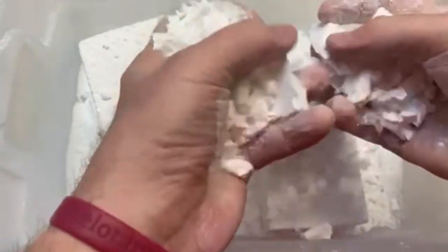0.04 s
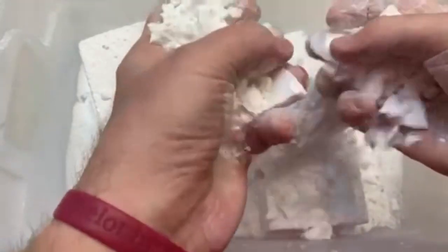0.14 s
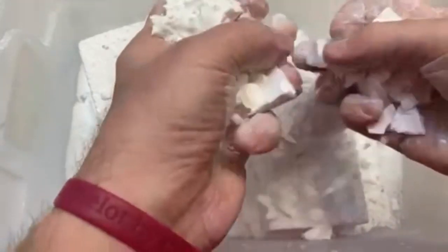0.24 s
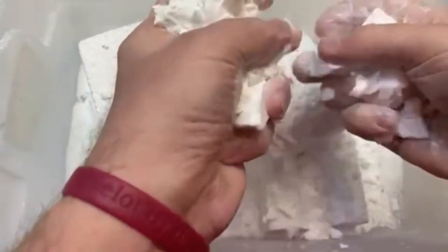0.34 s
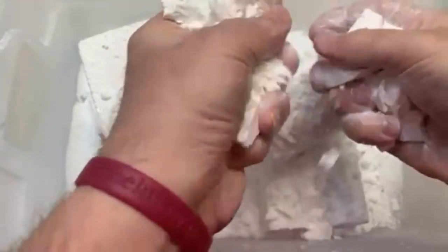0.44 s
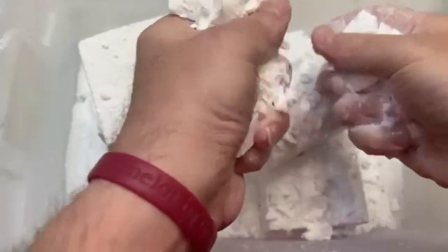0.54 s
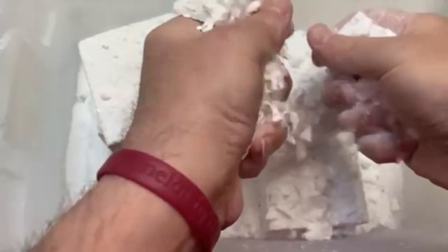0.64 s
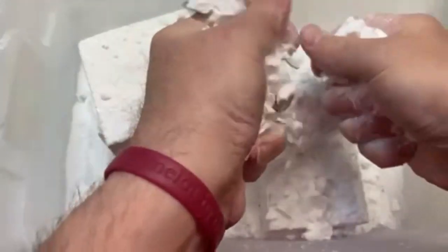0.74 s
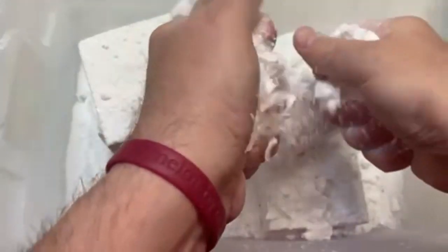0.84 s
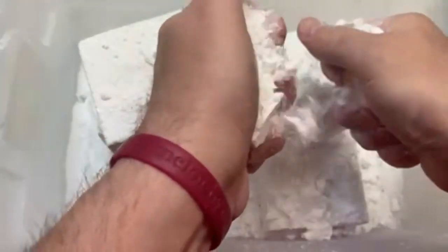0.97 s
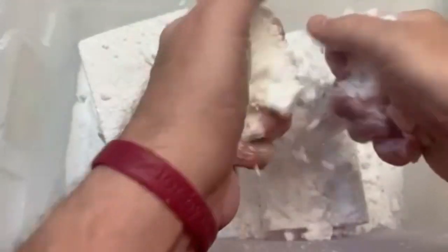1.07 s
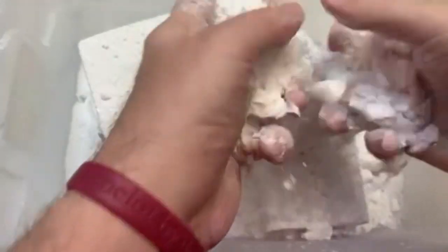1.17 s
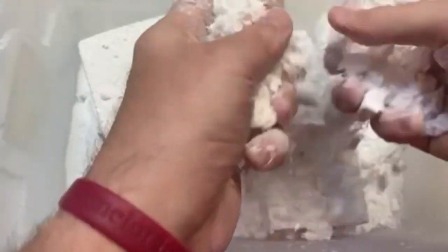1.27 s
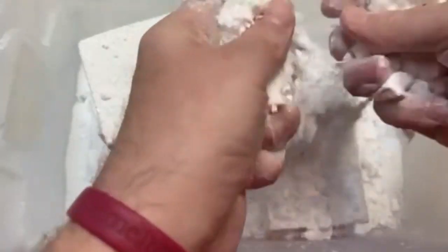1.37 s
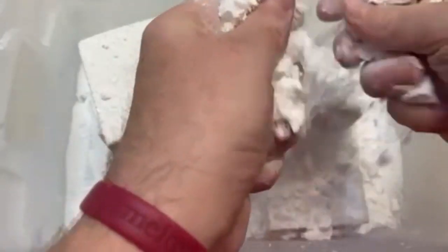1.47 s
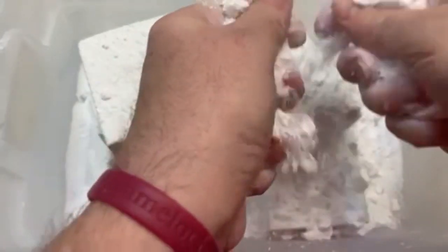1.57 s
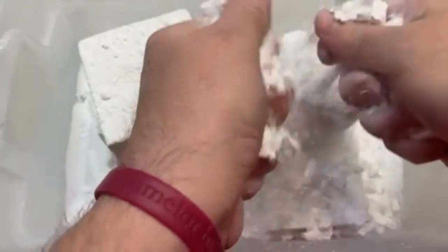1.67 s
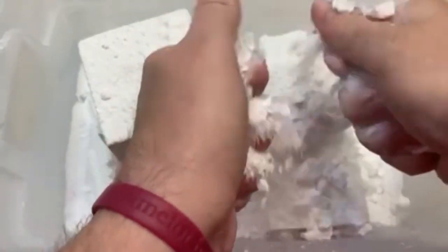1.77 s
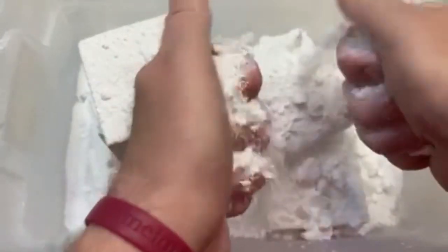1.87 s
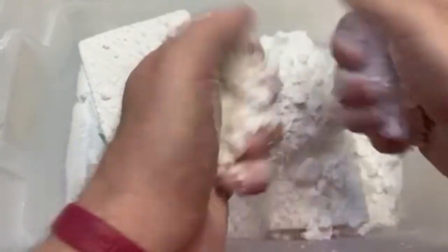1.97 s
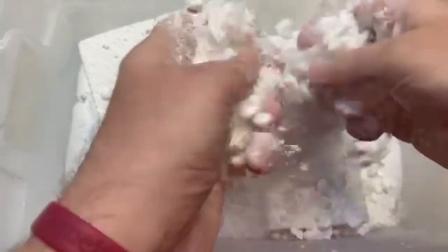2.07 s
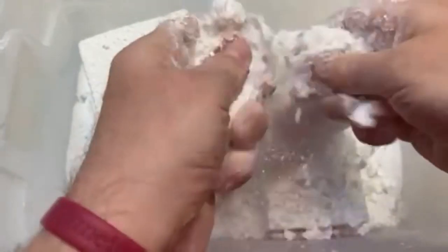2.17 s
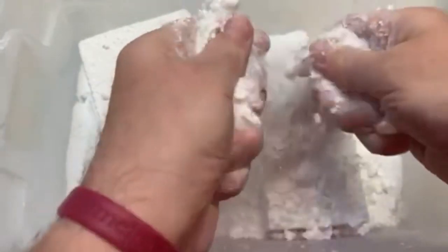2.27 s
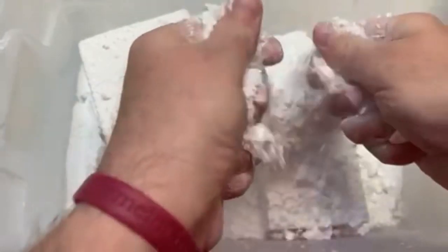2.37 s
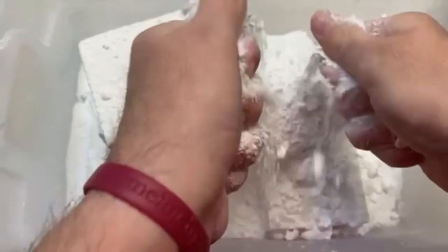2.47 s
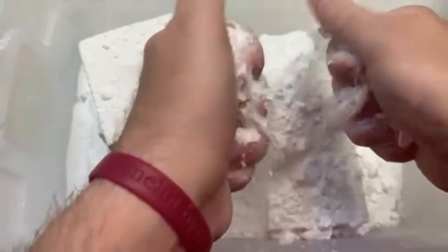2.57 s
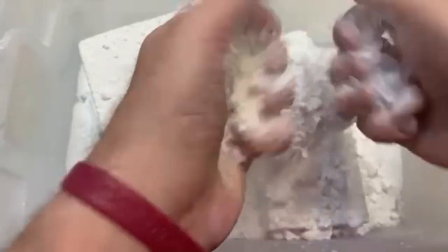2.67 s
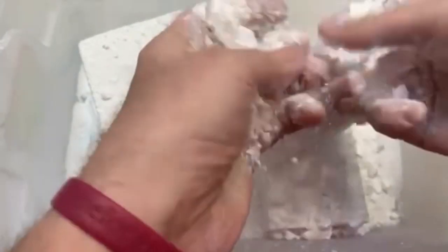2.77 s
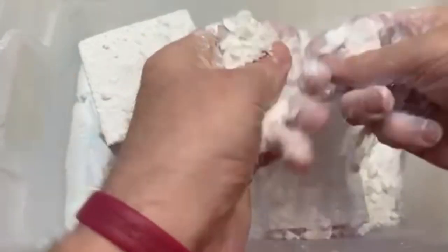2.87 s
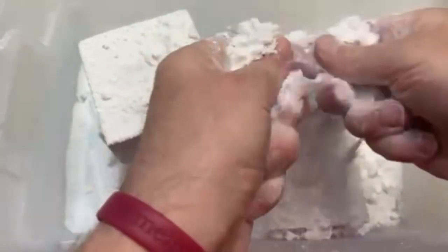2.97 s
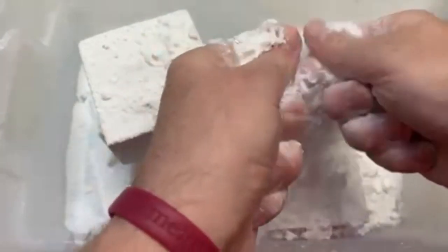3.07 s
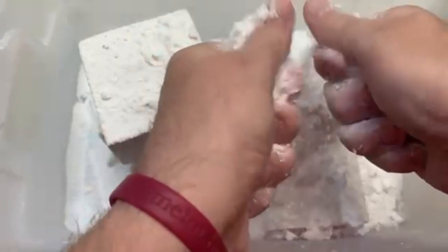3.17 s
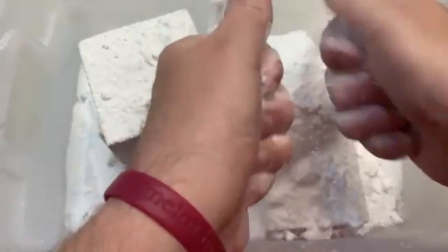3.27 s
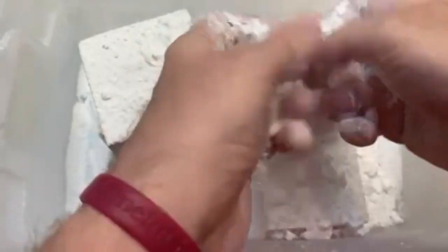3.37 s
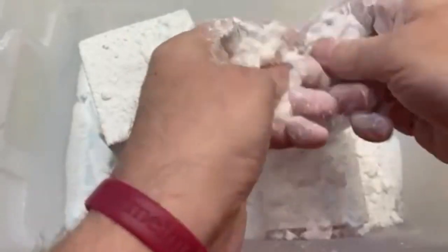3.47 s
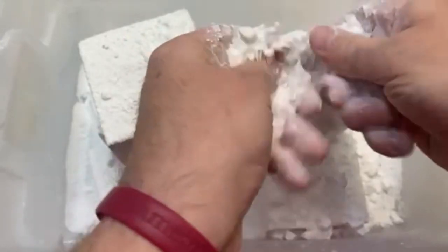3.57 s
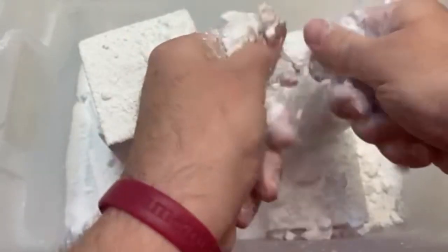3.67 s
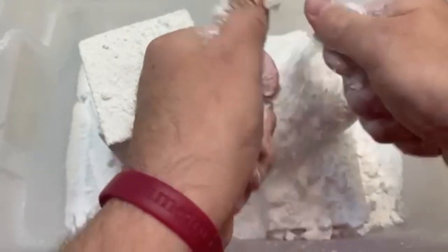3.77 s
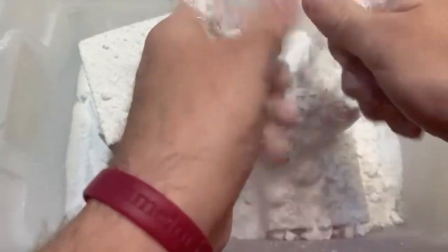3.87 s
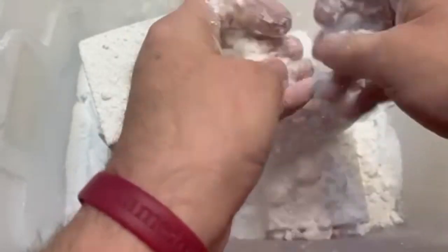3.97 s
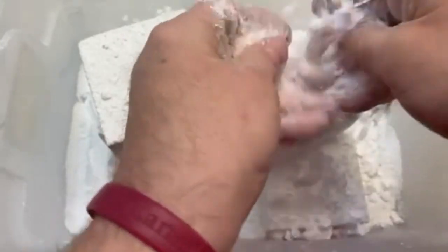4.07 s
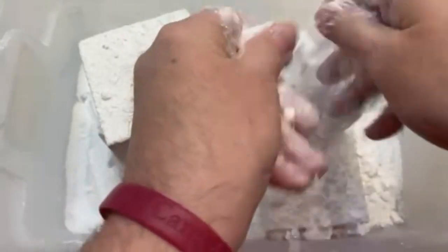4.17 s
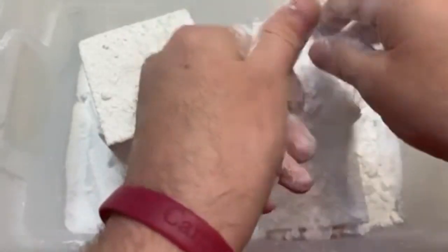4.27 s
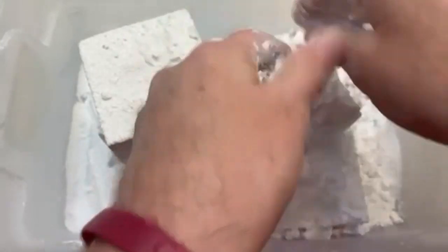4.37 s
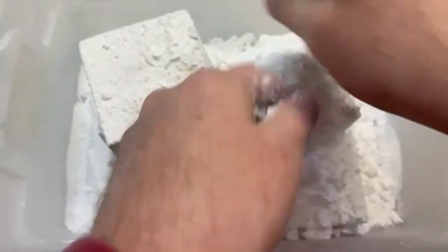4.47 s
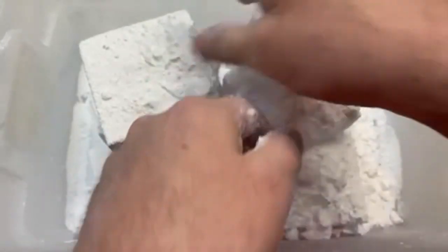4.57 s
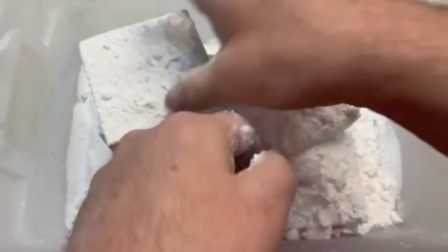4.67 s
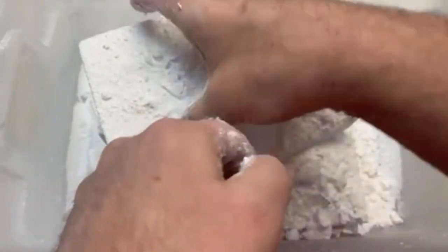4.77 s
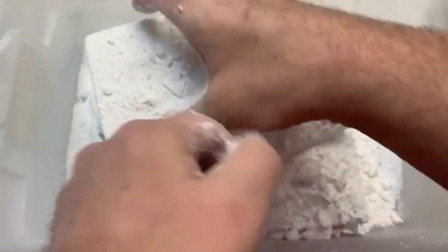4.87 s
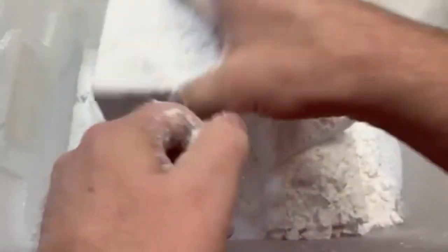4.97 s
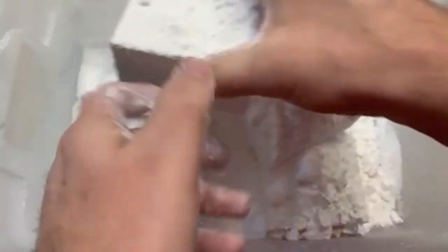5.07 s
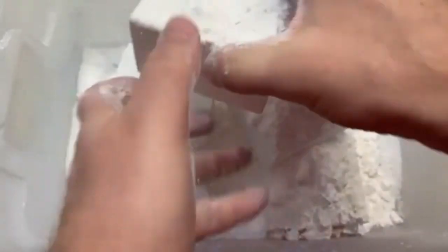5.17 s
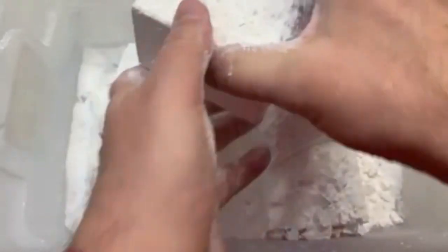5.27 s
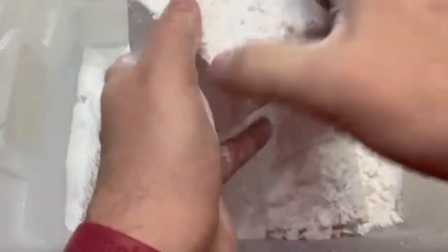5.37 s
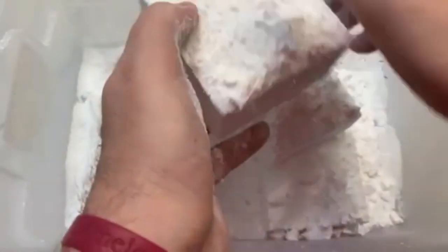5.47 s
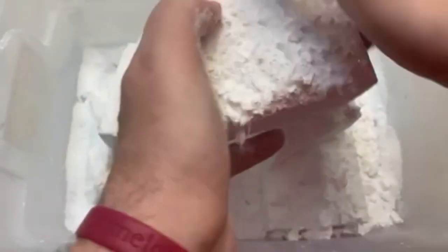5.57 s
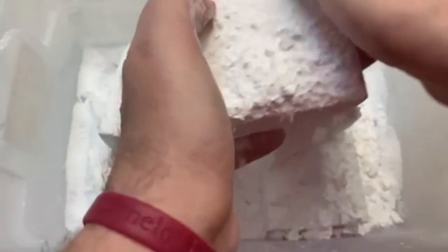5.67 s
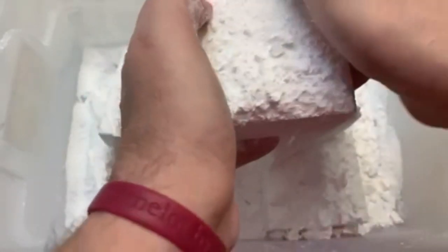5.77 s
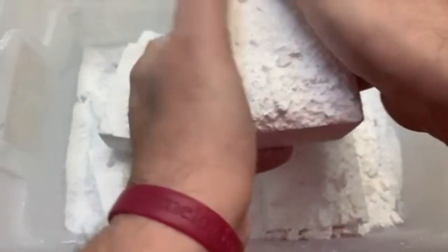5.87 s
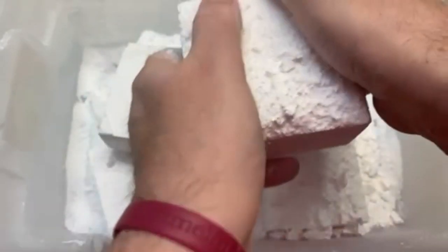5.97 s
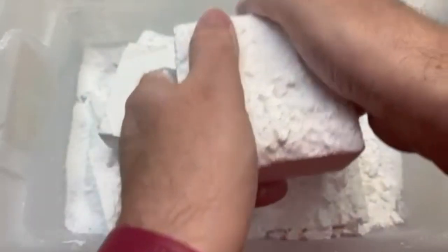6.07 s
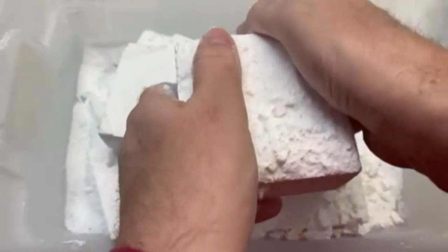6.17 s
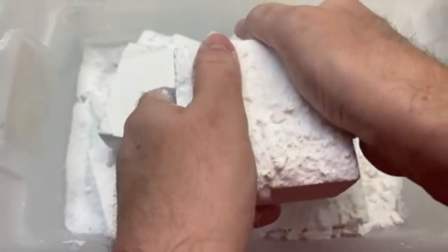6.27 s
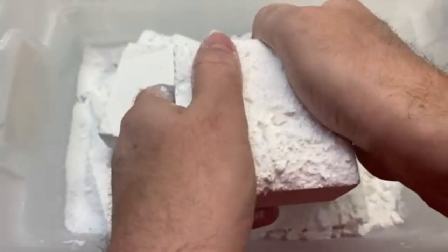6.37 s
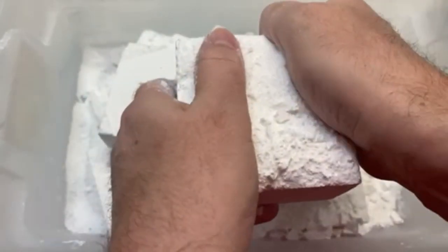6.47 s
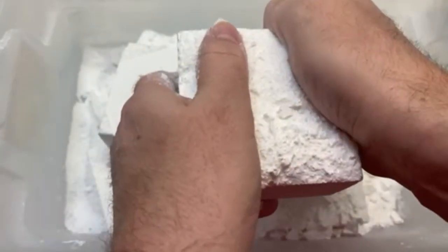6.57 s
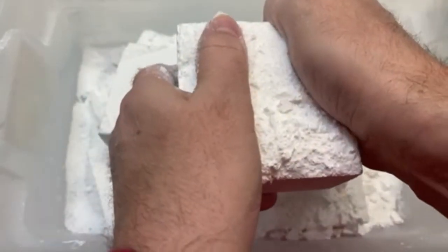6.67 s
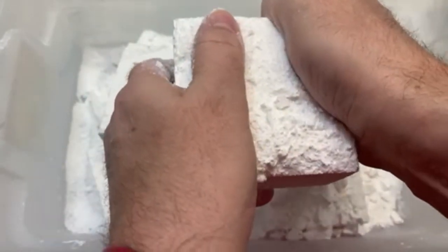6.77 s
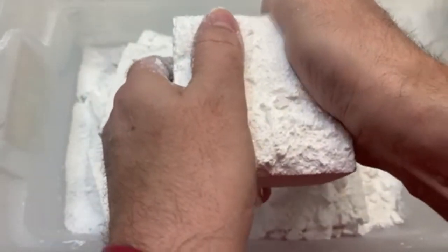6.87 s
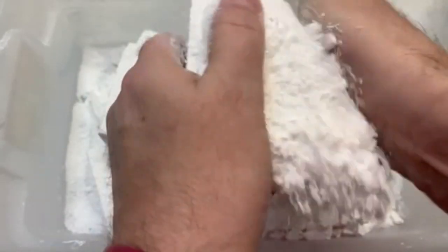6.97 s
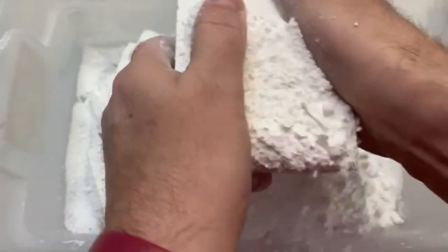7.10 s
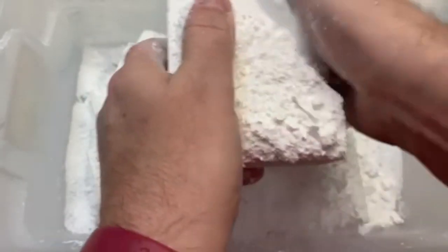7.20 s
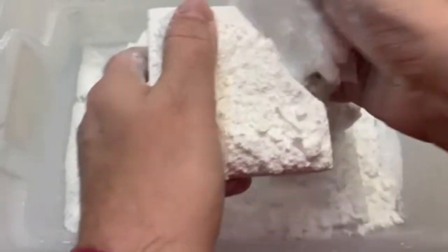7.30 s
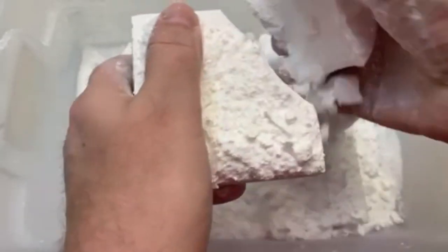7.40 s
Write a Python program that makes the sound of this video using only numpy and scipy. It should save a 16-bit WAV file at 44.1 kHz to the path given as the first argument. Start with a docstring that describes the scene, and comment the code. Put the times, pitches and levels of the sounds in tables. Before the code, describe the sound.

Dry chalk crunches and crackles between bare hands, then a fresh block is rubbed and snapped with one loud crack.

```python
"""A quiet room with a wavering hum, close to a plastic tub over which bare hands crush dry chalk.
Each fracture is an impulse that rings a lump or a chip; the lumps also drive the modes of the tub.
Countless tiny impacts merge into a bed of crumbs, grit and powder. A fresh block then knocks the tub,
hisses and rings under the friction of the palms, and snaps. The loudest cracks are clipped."""
import sys
import numpy as np
from scipy import signal
from scipy.fft import rfft, irfft
from scipy.io import wavfile

SR = 44100
rng = np.random.default_rng(int(sys.argv[2]) if len(sys.argv) > 2 else 0)


def persist_wave(psi):
    """Save psi, clipped to +-1, as 16-bit WAV."""
    counts = np.round(np.clip(psi, -1, 1) * 32767).astype(np.int16)
    wavfile.write(sys.argv[1], SR, np.atleast_2d(counts).T)


N = 328099

# Air noise of the room. Each row: frequency in Hz, spectral density in dB.
AIR_SPECTRUM = [(15, -5), (25, -18), (64, -7.5), (91, -13.5), (122, -2.5), (156, -14), (305, -12.5),
                (331, -19.5), (615, -25), (920, -29.5), (2630, -32), (3350, -36.5), (15500, -50.5)]
# Debris from the crushing hands. Each row: time in seconds, levels of crumble, grit and powder in dB.
GRIP_LEVELS = [(0.0, -25, -21, -30), (0.22, -24, -20, -29), (0.36, -24, -17, -28), (0.57, -27, -19, -28),
               (0.73, -29, -22, -31), (0.98, -31, -30, -40), (1.19, -31, -30, -40), (1.35, -24, -26, -37),
               (1.56, -25, -24, -33), (1.67, -26, -26, -33), (1.85, -29, -30, -41), (2.08, -29, -31, -41),
               (2.24, -27, -28, -37), (2.38, -29, -28, -37), (2.57, -32, -36, -45), (2.8, -33, -36, -45),
               (2.95, -31, -30, -41), (3.07, -30, -31, -41), (3.32, -33, -32, -44), (3.52, -33, -32, -44),
               (3.69, -34, -35, -41), (3.86, -36, -37, -44), (4.06, -35, -34, -43), (4.37, -34, -35, -49),
               (4.55, -39, -43, -52), (4.75, -39, -44, -52)]
# Debris from the broken block. Each row: time in seconds, levels of crumble, grit and powder in dB.
SHEDDING_LEVELS = [(6.92, -38, -42, -51), (7.004, -29, -31, -41), (7.074, -30, -30, -40),
                   (7.208, -31, -31, -41), (7.44, -32, -33, -42)]
# Coarse crumble, fine grit and sifting powder. Each row: frequency in Hz, spectral density in dB.
CRUMBLE_SPECTRUM = [(150, -37), (250, 2.5), (274, -10), (507, -1.5), (583, -8.5), (835, -2.5), (1420, -5.5),
                    (4000, -13.5), (5200, -80), (8800, -120)]
GRIT_SPECTRUM = [(1500, -22), (2500, -3), (4500, 1), (5700, -3.5), (6800, 3), (8200, -4), (15500, -19)]
POWDER_SPECTRUM = [(5000, -26), (8500, 6), (12500, 1), (15500, -12.5)]
# Modes of the plastic tub. Each row: frequency in Hz, bandwidth in Hz, gain in dB.
TUB_MODES = [(121, 41, -2), (236.3, 36, 1), (327, 14, -3), (374, 31, -4.5), (530, 70, -31), (720, 47, -7),
             (836, 57, -10)]
# Lumps cracking. Each row: start in seconds, peak of the lump's ring in dB, its pitch in Hz,
# peak of the upper ring in dB, peak of the tub's response in dB.
LUMP_CRACKS = [(.0383, -5.5, 700, -14, -13), (0.0536, -13, 344, -3, -14), (0.123, -21, 1180, -6, -21),
               (.168, -9, 1860, -1.5, -28), (0.2304, -6, 500, -3, -11.5), (.244, 2.5, 1130, -8, -11),
               (.2796, -1, 1830, -7, -13), (.2945, -2.5, 470, -3, -17), (0.3136, -17, 420, -1.5, -24),
               (.357, -13, 2600, -2.5, -17), (.4518, -4, 372, 3.5, -3), (.471, 8, 920, 8, -11),
               (0.4844, 11, 2470, 16, -2.5), (.503, -9, 2100, 2, -22), (0.5197, -10, 2710, -5, -15),
               (.6601, -8, 2000, -1, -34), (0.7048, -8, 2460, -12, -28), (0.7754, -12, 350, 1.5, -4),
               (1.0627, -14, 940, -9.5, -32), (1.18, -1, 1870, -7, -14), (1.2532, -3.5, 520, -12, -30),
               (1.2873, -19, 2460, 0.5, -6), (1.3016, -8, 750, -25, -15), (1.3427, 12.5, 730, -3, -10),
               (1.351, 9.5, 740, -25, -13), (1.39, 2, 1270, -25, -21), (1.3988, -0.5, 1750, -26, -13),
               (1.444, -4, 1170, -13, -16), (1.4578, -4, 1110, -8, -10), (1.59, -19, 1060, -5, -15),
               (1.6618, -3.5, 860, -4, -24), (1.678, -19, 2480, -6, -15), (1.6934, 14, 856, -6, -2.5),
               (1.7116, -8, 1180, -13, -22), (1.8572, -9, 780, -8.5, -20), (2.0125, -1, 724, -12, -36),
               (2.0205, -3.5, 720, -16, -20), (2.088, 0.5, 840, -22, -7), (2.098, -2.5, 374, -26, -17),
               (2.1338, -1.5, 874, -9, -18), (2.1458, -2, 820, -21, -13), (2.2647, -7.5, 374, 1, -5.5),
               (2.3151, -10, 377, -22, -21), (2.5055, -6, 348, -9, -2), (2.5111, 1, 650, -29, -29),
               (2.5284, -2.5, 530, 5, -5.5), (2.751, -5, 860, -15, -10.5), (2.8635, -9, 1070, -6, -22),
               (2.9305, -15, 656, -23, -30), (2.9617, -17, 1970, -16, -32), (3.1181, -5.5, 746, -0.5, -18),
               (3.201, -15, 1820, -22, -18), (3.212, -14, 920, -30, -30), (3.231, -3, 855, -28, -15),
               (3.3398, -16.5, 930, -14, -29), (3.374, -11, 1870, -17, -16), (3.4935, -6.5, 2790, -3, -13),
               (3.5311, -0.5, 2450, -12, -10), (3.5865, -13, 2130, -32, -26), (3.6124, -9, 387, -8, -11),
               (3.721, -17.5, 1500, -25, -19), (3.8341, 1, 1800, -32, -28), (3.8379, -11, 895, -26, -24),
               (3.8692, -15, 500, -18, -16), (4.0178, -14, 1940, -1, -21), (4.0636, -13, 2790, -6, -12.5),
               (4.086, -27, 1720, -3.5, -40), (4.1754, -12.5, 810, -30, -17.5),
               (4.3319, -13, 704, -8.5, -19), (4.3923, -16, 760, -14.5, -27), (4.527, -13, 870, -5.5, -14),
               (4.675, -24, 1500, -30, -35), (4.849, -20, 500, -25, -13), (4.869, -9, 660, -24, -12),
               (5.8167, -13.5, 690, -14, -25), (7.0152, -14, 890, -6.5, -23), (7.0373, -15, 440, -19, -10),
               (7.189, -18, 740, -25, -22), (7.2179, -15, 1860, -14, -24), (7.2339, -5, 2660, -27, -20),
               (7.405, -16.5, 660, -22, -14)]
# Chips flying off. Each row: start in seconds, peak of the ring in dB, its pitch in Hz,
# gain of the tick in dB relative to that peak.
FLYING_CHIPS = [(0.0395, -1, 3300, 2), (0.053, -9, 3330, -21), (0.0832, -7, 6770, -15),
                (0.1244, -18, 2780, -21), (0.1686, 8, 4370, -12), (0.1813, -3, 5030, -21),
                (0.2237, 1.5, 4480, -21), (0.2495, -6, 2820, -26), (0.2737, -2, 3640, -16),
                (0.2824, 1, 4370, -18), (0.3046, -8, 2800, -17), (0.3476, -1, 6940, -18),
                (0.383, 1, 4430, -13), (0.4197, -4, 4520, 1), (0.4438, 1, 4460, -16), (0.4524, 7, 3550, -7),
                (0.4757, 4, 5100, -13), (0.4874, 7, 4640, -13), (0.505, 3, 4120, -22), (0.565, -9, 2840, 7),
                (0.5874, -8, 5000, -21), (0.6037, -8, 3820, -17), (0.6589, 1, 4330, -24),
                (0.6784, -8, 6920, -19), (0.7023, -6, 7370, -19), (0.717, -1, 4430, -21),
                (0.7462, -3, 6750, -16), (0.776, 0.5, 3700, -4), (0.844, -7, 2700, -9.5),
                (0.9197, -1, 3040, -25), (1.061, -5, 3120, -25), (1.1804, -7, 3240, -25),
                (1.2482, -6.5, 4300, -23), (1.3418, -19, 2930, -26), (1.458, -1, 6790, -12),
                (1.476, -8, 5160, -16), (1.553, -3, 6560, -17), (1.5913, -7, 3800, -15),
                (1.6064, -10, 6900, -13), (1.6584, -8.5, 4470, -20), (1.6933, 2, 2820, -21),
                (2.0113, -10.5, 2720, -5), (2.2205, -9, 2700, -22), (2.2643, -4, 2840, -8),
                (2.3146, -2.5, 6870, -18), (2.4329, -7.5, 6400, -23), (2.5292, -3.5, 3130, -22),
                (2.8614, -3.5, 3000, -10), (3.019, -16, 6740, -16), (3.1907, -17, 5840, -21),
                (3.2575, -37, 3660, -22), (3.495, -1.5, 2700, -24), (3.5054, -2, 3370, -11),
                (3.53, 4, 2850, -20), (3.556, -5, 3090, -27), (3.571, -6.5, 6850, -19),
                (3.5855, -3.5, 3020, -15), (3.6103, 4.5, 6540, -5), (3.634, -2, 6740, -17),
                (3.8414, -14, 2910, -22), (3.9495, -11.5, 5060, -18), (4.0179, 5.5, 4600, -15),
                (4.0564, -6, 3800, -8), (4.0632, 1, 4310, -21), (4.0857, -3.5, 2900, -26),
                (4.1375, -12, 2810, -13), (4.2025, -6, 4240, -17), (4.361, -13, 4060, -25),
                (4.4393, -21, 5000, -14), (4.4588, -16, 3580, -19), (4.492, -16, 2770, -21),
                (4.5514, -20, 4060, -13), (4.9651, -24, 3320, -26), (5.5176, -15, 4300, -10),
                (6.2626, -14, 3780, -26), (6.6058, -17, 2710, -20), (7.0481, -1, 2750, -26),
                (7.1477, -11, 6900, -14), (7.236, 14, 6200, -8)]
# Palms sliding on the block. Each row: start in seconds, length in seconds, ring in dB, hiss in dB.
PALM_STROKES = [(4.756, .01, -46, -42), (4.82, .02, -46, -35), (5.254, .06, -30, -24),
                (5.36, .04, -38, -42), (5.46, .02, -36, -35), (5.519, 0.35, -32.5, -30),
                (5.88, .03, -36, -33), (6.04, .055, -32, -44)]
# Modes of the rubbed block. Each row: frequency in Hz, bandwidth in Hz, gain in dB.
BLOCK_MODES = [(2930, 170, 7), (3490, 230, 5.5), (3820, 360, 5.5), (4370, 64, 5.5), (5300, 190, 0),
               (6800, 74, -20), (7150, 40, -20)]
# Hiss of sliding skin. Each row: frequency in Hz, spectral density in dB.
SKIN_SPECTRUM = [(1470, -59), (2500, -7), (4330, 1), (4790, -8.5), (6910, 0.5), (8050, -10), (12900, -10),
                 (15500, -19)]
# The block knocking the tub. Each row: start in seconds, level in dB, pitch in Hz.
TUB_KNOCKS = [(4.802, -5.5, 106), (4.857, -4, 146), (4.879, 1, 119), (4.916, -7.5, 73),
              (5.247, -16.5, 64.6), (5.509, -16, 167)]
# The block breaking. One row: start in seconds, level in dB, tearing time and T60 in seconds.
BLOCK_BREAK = (6.8372, 8.4, 0.009, 0.17)
# Noise of that break. Each row: frequency in Hz, spectral density in dB.
BREAK_SPECTRUM = [(60, -24), (130, 3), (280, 5), (1200, -3.5), (3000, -6), (7000, -17), (15000, -27.5)]


def from_db(db):
    """Amplitude grows tenfold with every 20 dB."""
    return 10 ** (np.asarray(db) / 20)


def rms_one(x):
    """Normalisation to unit power."""
    return x / np.sqrt(np.mean(x ** 2) + 1e-20)


def peak_one(x):
    """Normalisation to unit peak."""
    return x / np.abs(x).max()


def add(track, start_s, x):
    """Superposition: a short sound adds to the track."""
    i = round(start_s * SR)
    track[i:i + len(x)] += x[:N - i]


def envelopes(rows, off_db=-100):
    """Interpolation in dB gives one gain curve per level column, silent outside the table."""
    times, *columns = np.transpose(rows)
    return from_db([np.interp(np.arange(N) / SR, times, db, off_db, off_db) for db in columns])


def drift(hz):
    """Low-passed noise wanders slowly with unit spread."""
    r = np.exp(-2 * np.pi * hz / SR)
    return rms_one(signal.lfilter([1], [1, -2 * r, r * r], rng.standard_normal(N + SR))[SR:])


def resonate(x, hz, width_hz):
    """A damped oscillator with unit gain at resonance."""
    r = np.exp(-np.pi * width_hz / SR)
    feedback = [1, -2 * r * np.cos(2 * np.pi * hz / SR), r * r]
    return signal.lfilter([(1 - r * r) / 2, 0, (r * r - 1) / 2], feedback, x + 1e-18)


def colour(x, spectrum):
    """A causal, minimum-phase filter imposes a spectrum and keeps the power of white noise."""
    hz = np.linspace(0, SR / 2, 4097) + 1
    knots_hz, knots_db = np.transpose(spectrum)
    log_gain = np.log(from_db(np.interp(np.log(hz), np.log(knots_hz), knots_db)))
    cepstrum = irfft(log_gain)
    cepstrum[1:4096] *= 2   # folded onto positive time
    cepstrum[4097:] = 0
    response = rms_one(irfft(np.exp(rfft(cepstrum)))) / np.sqrt(8192)
    return signal.oaconvolve(x, response)[:N]


def room(air_db=-30, hum_db=-34.5, hum_hz=120.3, width_hz=10.2):
    """Narrow-band noise beats within itself: a wavering hum over steady broadband air noise."""
    hum = resonate(resonate(rng.standard_normal(N), hum_hz, width_hz), hum_hz, 4 * width_hz)
    air = colour(rng.standard_normal(N), AIR_SPECTRUM)
    return from_db(air_db) * air + from_db(hum_db) * rms_one(hum)


def grains(base_per_s, spread_db, t60, hiss):
    """Shot noise: tiny fractures come in clusters, each a decaying puff, over a share of smooth hiss."""
    onsets = rng.random(N) < base_per_s * from_db(5 * drift(12)) / SR
    sizes = from_db(spread_db * np.minimum(rng.exponential(1, N), 3.5))
    puffs = signal.lfilter([1], [1, -from_db(-60 / (t60 * SR))], onsets * sizes + 1e-18)
    return rms_one((rms_one(puffs) + hiss) * rng.standard_normal(N))


def tinkle(low_hz, high_hz):
    """Size sets resonance: four sizes of grit each ring in their own band."""
    bands = [resonate(grains(90, spread_db=7.5, t60=0.011, hiss=0.08), hz, 0.14 * hz)
             for hz in np.geomspace(low_hz, high_hz, 4)]
    return rms_one(sum(map(rms_one, bands)))


def tub(force):
    """Modal superposition: the tub answers a force with parallel resonances of alternating sign."""
    return sum((-1) ** k * from_db(db) * resonate(force, hz, width)
               for k, (hz, width, db) in enumerate(TUB_MODES))


def crumbs(per_s=40, relative_width=0.3):
    """A Poisson process: single crumbs land at random, each ringing at the pitch of its size."""
    onsets = rng.random(N) < per_s / SR
    impacts = onsets * from_db(5 * np.minimum(rng.exponential(1, N), 3)) * rng.choice([-1, 1], N)
    pitches_hz = np.geomspace(600, 5000, 12)
    size_class = rng.integers(0, len(pitches_hz), N)
    return rms_one(sum(resonate(impacts * (size_class == k), hz, relative_width * hz) / hz
                       for k, hz in enumerate(pitches_hz)))


def shower_gain(breaks, db, t60):
    """Incoherent sources add in power: each break frees a fading shower that grows with it, up to a cap."""
    kicks = np.zeros(N)
    starts, peak_db = np.transpose(breaks)[:2]
    np.add.at(kicks, (starts * SR).astype(int), from_db(2 * np.minimum(peak_db, 0)))
    power = signal.lfilter([1], [1, -from_db(-120 / (t60 * SR))], kicks + 1e-18)
    return from_db(db) * np.sqrt(power)


def crumbling():
    """Granular noise: finer debris sounds higher, and the coarse part shakes the tub wall as it falls."""
    coarse_gain, grit_gain, powder_gain = envelopes(GRIP_LEVELS) + envelopes(SHEDDING_LEVELS)
    debris_gain = shower_gain(LUMP_CRACKS, db=-22, t60=0.25)
    dust_gain = shower_gain(FLYING_CHIPS, db=-28.5, t60=0.24)
    crumble = colour(grains(450, spread_db=3, t60=0.012, hiss=0.5), CRUMBLE_SPECTRUM)
    ticks = grains(600, spread_db=5.5, t60=0.012, hiss=0.58)   # common to grit and powder
    grit = rms_one(colour(ticks + 0.33 * tinkle(2620, 5900), GRIT_SPECTRUM))
    sifting = ticks + 0.36 * tinkle(9000, 10150) + 0.29 * rng.standard_normal(N)
    powder = rms_one(colour(sifting, POWDER_SPECTRUM))
    wall = rms_one(tub(grains(120, spread_db=10.5, t60=0.17, hiss=0.45)))
    coarse = crumble + from_db(-6) * wall + from_db(-10) * crumbs()
    return ((coarse_gain + debris_gain) * coarse
            + (grit_gain + dust_gain) * grit
            + (powder_gain + from_db(-10) * dust_gain) * powder)


def fracture(noise, t60, click):
    """Brittle fracture opens with one impulse; the tearing after it decays exponentially."""
    tearing = noise * from_db(-60 * np.arange(len(noise)) / SR / t60)
    return tearing + click * signal.unit_impulse(len(noise)) * np.sign(noise[0])


def cracks(t60_at_1khz=0.021):
    """Impulse excitation: a break rings the lump in two bands and pushes the tub; soft chalk is dull."""
    track = np.zeros(N)
    noises = rng.standard_normal((len(LUMP_CRACKS), 4000))
    for (start, db, hz, upper_db, tub_db), noise in zip(LUMP_CRACKS, noises):
        t60 = t60_at_1khz * (hz / 1000) ** -0.26   # higher lumps die sooner
        burst = fracture(noise, t60, click=7.3)
        ring = resonate(resonate(burst, hz, 0.5 * hz), hz, hz)
        upper_ring = resonate(resonate(burst, hz=1650, width_hz=1500), hz=1260, width_hz=1900)
        add(track, start, from_db(db) * peak_one(ring))
        add(track, start, from_db(upper_db) * peak_one(upper_ring))
        add(track, start, from_db(tub_db) * peak_one(tub(burst)))
    return track


def chips():
    """Small bodies resonate high: each chip leaves with a bright tick and a short ring at its own pitch."""
    ticks, rings = np.zeros((2, N))
    noises = rng.standard_normal((len(FLYING_CHIPS), 1500))
    for (start, db, hz, tick_db), noise in zip(FLYING_CHIPS, noises):
        burst = fracture(noise, t60=0.0094, click=4.9)
        ring = resonate(resonate(burst, hz, 0.21 * hz), hz, 2.7 * hz)
        add(rings, start, from_db(db) * peak_one(ring))
        add(ticks, start, from_db(db + tick_db) * burst)
    return rings + colour(ticks, GRIT_SPECTRUM) + 0.5 * colour(ticks, POWDER_SPECTRUM)


def echoes(x, db=-16.5, t60=0.18, gap_s=0.004, cutoff_hz=6500):
    """Reverberation: after a short gap the walls return a dull, exponentially decaying tail."""
    t = np.arange(SR // 2) / SR
    tail = rng.standard_normal(len(t)) * from_db(-60 * t / t60) * (t > gap_s)
    tail = signal.lfilter(*signal.butter(1, cutoff_hz, fs=SR), tail)
    return signal.oaconvolve(x, from_db(db) * tail / np.sqrt(np.sum(tail ** 2)))[:N]


def rubbing(rise_db_per_s=800, swell_db_per_s=15, fall_db_per_s=500):
    """Friction: sliding skin hisses and rings the block, whose modes come and go with the grip."""
    friction = grains(1500, spread_db=7, t60=0.01, hiss=2.2)
    ring = sum(from_db(db + 3.5 * drift(9)) * resonate(friction, hz, width)
               for hz, width, db in BLOCK_MODES)
    ring_gain, hiss_gain = np.zeros((2, N))
    for start, length, ring_db, hiss_db in PALM_STROKES:
        t = np.arange(N) / SR - start
        stroke_db = (rise_db_per_s * np.minimum(t, 0) + swell_db_per_s * np.clip(t, 0, length)
                     - fall_db_per_s * np.maximum(t - length, 0))
        ring_gain += from_db(ring_db + stroke_db)
        hiss_gain += from_db(hiss_db + stroke_db)
    return ring_gain * rms_one(ring) + hiss_gain * colour(friction, SKIN_SPECTRUM)


def knocks(t60=0.12):
    """Damped free vibration: each soft knock of the block on the tub lasts a few cycles."""
    track = np.zeros(N)
    t = np.arange(4000) / SR
    for start, db, hz in TUB_KNOCKS:
        add(track, start, from_db(db - 60 * t / t60) * np.sin(2 * np.pi * hz * t))
    return track


def snap(tub_db=-8, tub_t60=0.4):
    """Crack propagation: noise holds while the block tears, then decays; the tub booms on for longer."""
    start, db, tearing_s, t60 = BLOCK_BREAK
    t = np.arange(N) / SR - start
    tear_gain = (t > 0) * from_db(db - 60 * np.clip(t - tearing_s, 0, 1) / t60)
    boom_gain = (t > 0) * from_db(tub_db - 60 * np.clip(t, 0, 1) / tub_t60)
    boom = rms_one(tub(rng.standard_normal(N)))
    tear = from_db(0.6 * drift(79)) * rng.standard_normal(N)
    return colour(tear_gain * tear, BREAK_SPECTRUM) + boom_gain * boom


def scene():
    """Sound pressures add: hands and chalk, their echoes and the room, in one channel."""
    chalk = cracks() + chips() + crumbling() + rubbing() + knocks() + snap()
    return (chalk + echoes(chalk) + room())[None]


def record(dry):
    """Overload clips the peaks flat; a steep low-pass filter then limits the bandwidth."""
    cutoff_hz = 15720
    low_pass = signal.ellip(10, 0.5, 40, cutoff_hz, fs=SR, output="sos")
    return signal.sosfilt(low_pass, np.clip(dry, -1, 1))


dry = scene()
out = record(dry)
persist_wave(out)
```